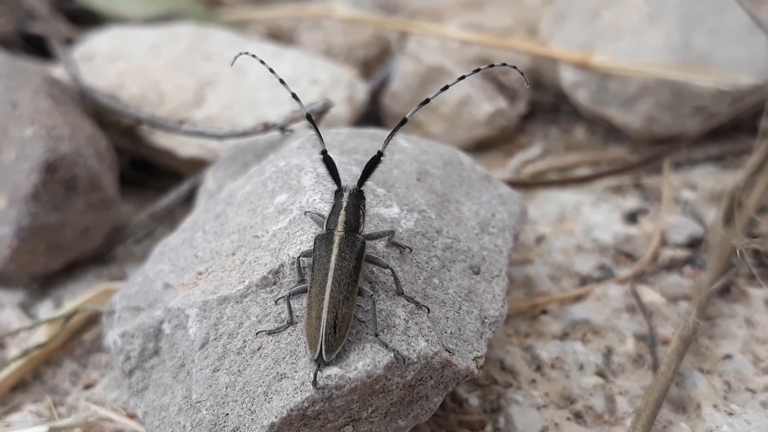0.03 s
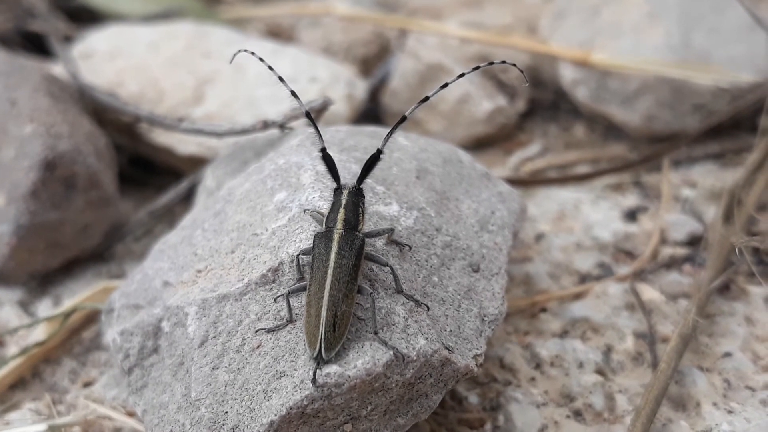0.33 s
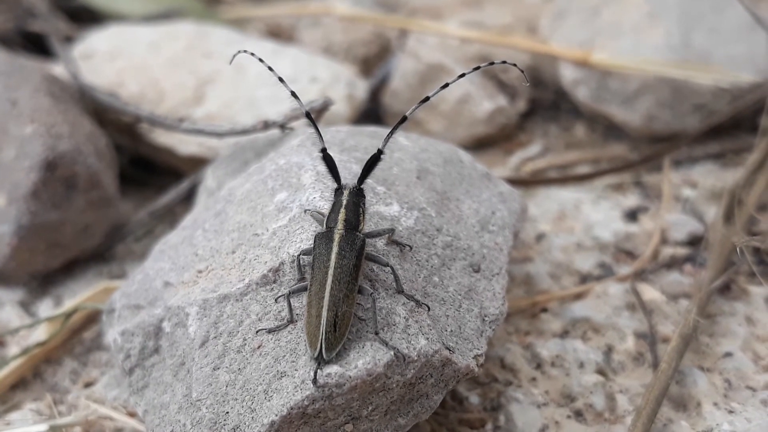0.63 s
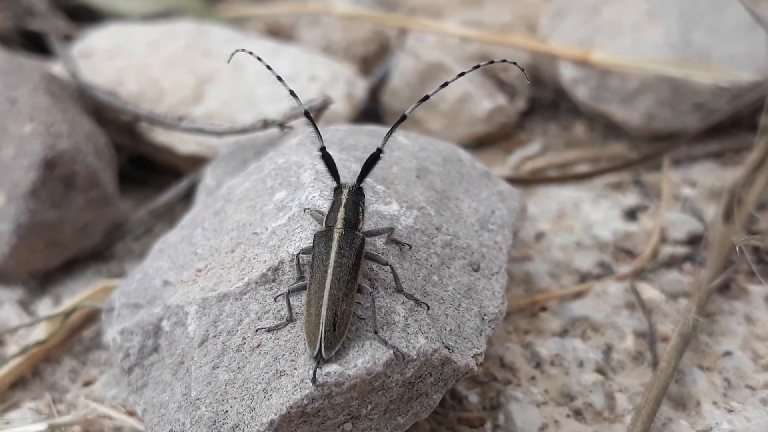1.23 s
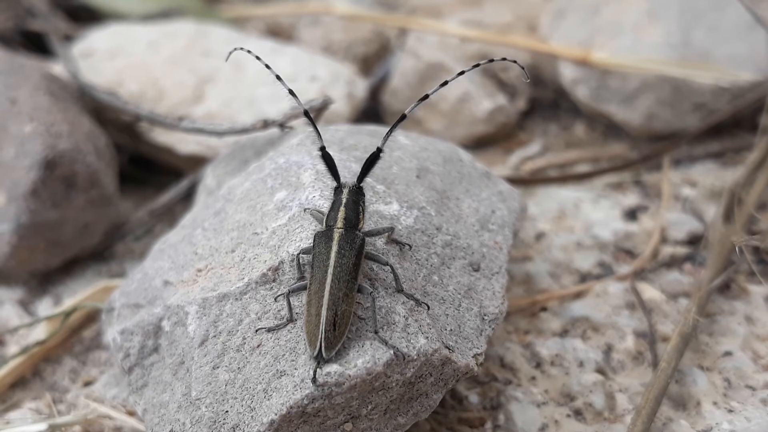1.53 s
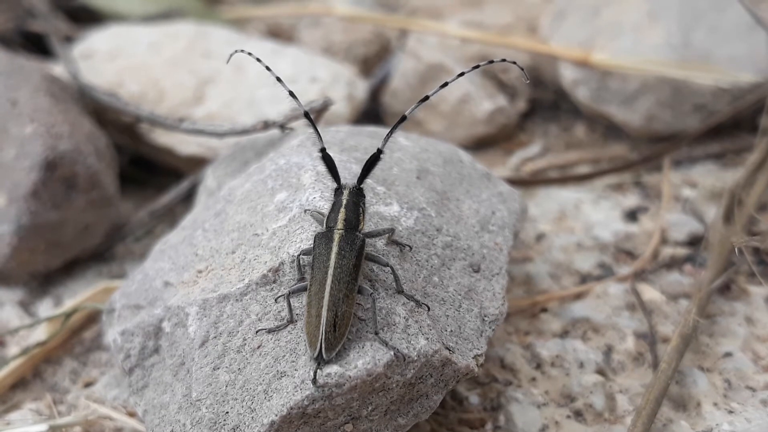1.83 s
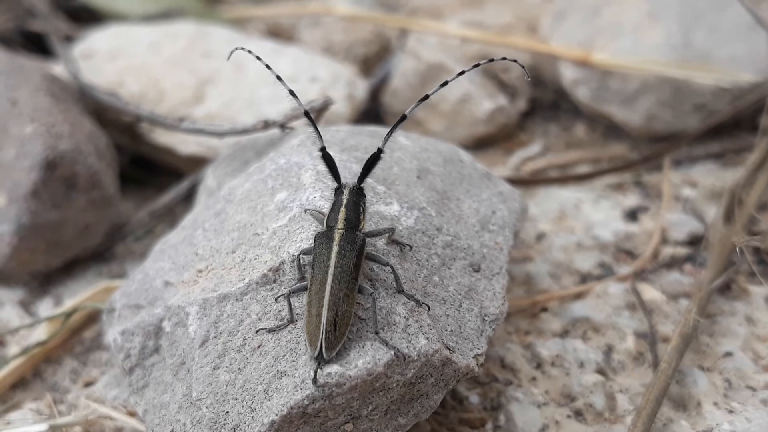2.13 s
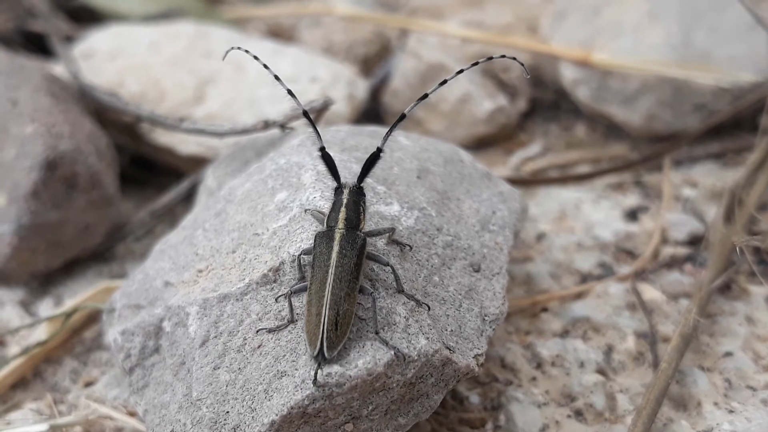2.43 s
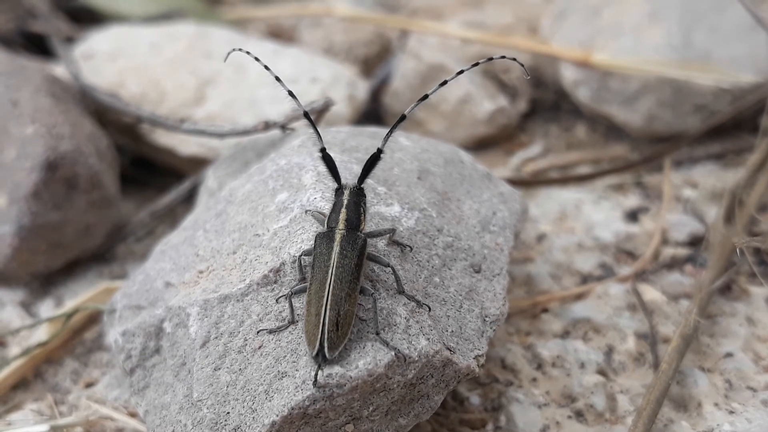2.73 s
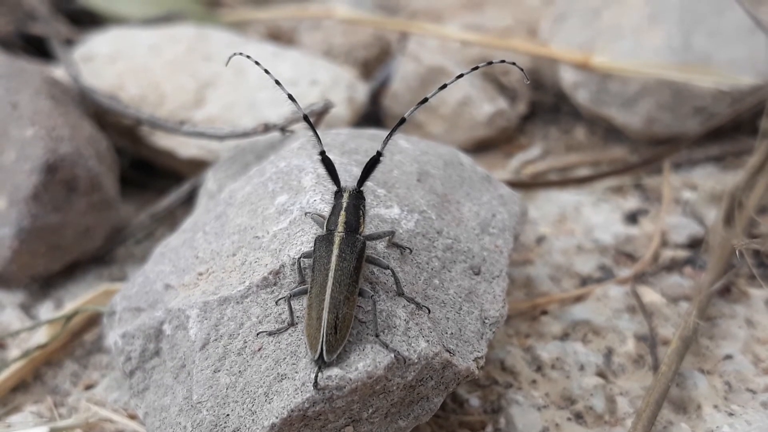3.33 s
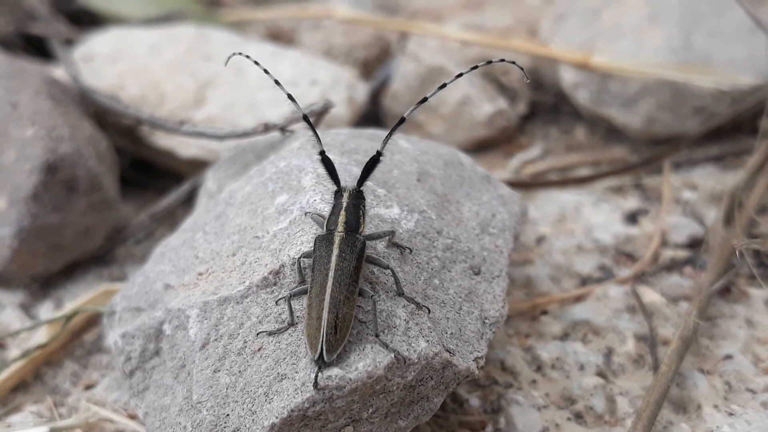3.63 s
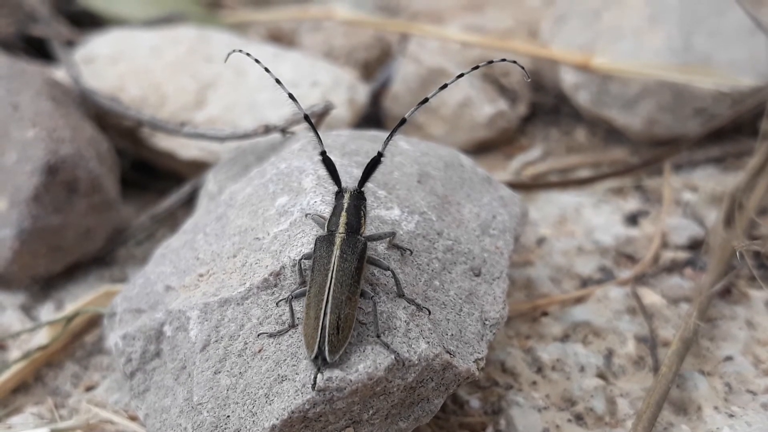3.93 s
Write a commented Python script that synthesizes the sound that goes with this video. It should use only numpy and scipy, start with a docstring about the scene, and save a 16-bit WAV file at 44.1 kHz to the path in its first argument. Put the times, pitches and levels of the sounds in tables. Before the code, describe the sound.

Short, slightly echoing bird chirps come in scattered groups from a distance, loudest near the end. A far road rumbles throughout, while light wind nudges the microphone and something dry ticks faintly nearby in the first half.

```python
"""Small birds chirp among trees and rocks, some way off the microphone: short arching whistles,
pure or raspy, each trailing a diffuse echo. A far road rumbles steadily behind them.
A light breeze blows on the microphone and a few eddies bump it. Close by, something dry
ticks, creaks in runs of tiny slips and rustles faintly.
The image is almost mono; only the microphone hiss has a little width."""
import sys
import numpy as np
from scipy import signal
from scipy.fft import rfft, irfft, next_fast_len
from scipy.io import wavfile
from scipy.ndimage import map_coordinates

SR = 44100
rng = np.random.default_rng(int(sys.argv[2]) if len(sys.argv) > 2 else 0)


def master(y):
    """Save y as 16-bit WAV."""
    cut = np.clip(np.atleast_2d(y).T, -1, 1)
    pcm = np.round(cut * 32767)  # scale
    wavfile.write(sys.argv[1], SR, pcm.astype(np.int16))


N = 176400


def amp(db):
    """Decibels to gain."""
    return 10 ** (np.asarray(db) / 20)


def unit(x):
    """Scale to rms 1."""
    return x / np.sqrt(np.mean(x ** 2) + 1e-20)


def curve(rows):
    """One value per sample from (time [s], value) points."""
    return np.interp(np.arange(N) / SR, *np.transpose(rows))


def wobble(rate):
    """A smooth random curve, rate knots a second."""
    return map_coordinates(rng.standard_normal(4096), [np.arange(N) * rate / SR], mode="wrap")


def filtered(x, response):
    """Filter x by a gain given as a function of frequency."""
    size = next_fast_len(N + 8192)
    return irfft(rfft(x, size) * response(np.fft.rfftfreq(size, 1 / SR)), size)[..., :N]


def noise(colour):
    """Noise of rms 1, its spectrum shaped by (frequency [Hz], gain [dB]) points."""
    points_hz, db = np.transpose(colour)
    white = rng.standard_normal(N)
    return unit(filtered(white, lambda hz: amp(np.interp(np.log(hz + 1), np.log(points_hz), db))))


def add(track, start, x):
    """Mix x into the track at start seconds."""
    i = int(np.clip(round(start * SR), 0, N))
    track[i:i + len(x)] += x[:N - i]


def birds():
    """Whistles some way off arch in pitch and reach the microphone directly and through the trees."""
    # bird notes (start [s], length [s], first pitch [Hz], top pitch [Hz], last pitch [Hz],
    # level [dB], echo send [0-1], rasp [0-1])
    notes = [ (0.069, 0.042, 4230, 4410, 4170, -70, .9, .6),
             (0.136, 0.13, 3700, 3910, 3790, -63, 0.7, 0.48),
             (0.265, 0.072, 3850, 3790, 3680, -63.5, 0.25, .45),
             (0.445, .035, 4120, 4530, 4400, -63.5, .8, 0.57),
             (0.471, 0.055, 5820, 6250, 5400, -64, 0.37, 0.2),
             (0.482, .04, 5080, 5620, 4960, -65, 0.6, 0.64),
             (0.519, 0.045, 3780, 4550, 4030, -58, 0.56, 0.58),
             (0.549, 0.048, 3500, 4365, 3550, -53, 0.88, .8), (.574, .048, 5250, 6100, 5450, -67, 0.4, 1),
             (0.603, 0.022, 5600, 5660, 5460, -61.5, 0.05, 0),
             (.609, 0.023, 3410, 4730, 3330, -55.5, 0.1, .1),
             (.666, 0.021, 3370, 4400, 3670, -59, 0.18, .15),
             (.733, .015, 4430, 4370, 4040, -64.5, .2, 0.02),
             (.783, 0.021, 4000, 4350, 4330, -76, 0.1, 0.4), (1.025, 0.05, 4170, 4400, 4270, -71, 0.6, 0.5),
             (1.419, 0.029, 4480, 4300, 3760, -62, 0.06, 0.24),
             (1.436, 0.06, 3800, 4170, 3830, -67, 0.5, .5),
             (1.427, 0.063, 5470, 5920, 5500, -75, 0.7, 0.96),
             (1.486, 0.013, 3750, 3800, 3670, -59, 0.57, 0.19),
             (1.819, 0.21, 3870, 4000, 3800, -72.5, 0.7, .7),
             (2.012, 0.05, 3650, 3610, 3330, -63, 0.75, 0.26),
             (2.021, 0.033, 3730, 4860, 3900, -56.5, 0.95, 0.47),
             (2.108, 0.029, 3500, 3710, 3280, -56, 0.22, 0.1),
             (2.133, 0.035, 3390, 5070, 3730, -58.5, 0.02, .08),
             (2.159, 0.015, 4000, 4100, 3970, -56.5, .1, 0.2),
             (2.471, 0.015, 4370, 4590, 4550, -66, 0.8, 0.3), (2.525, .04, 5170, 5800, 5460, -75, 0.9, 0.7),
             (2.537, 0.027, 3720, 3910, 3700, -57.5, 0.92, 0.34),
             (2.566, .028, 4090, 4610, 3740, -55, 0.24, 0.04),
             (2.611, 0.015, 3660, 3980, 3640, -59, 0.2, 0.4),
             (2.633, 0.026, 3570, 4027, 3640, -54.5, 0.4, 0.37),
             (2.645, 0.0365, 3930, 4400, 3600, -75, 0.5, 0.63),
             (3.062, .085, 3420, 4700, 4320, -61.5, 0.74, 0.75),
             (3.09, .045, 4900, 5630, 5200, -70, 0.8, .9),
             (3.157, .048, 3394, 4270, 3870, -54.5, 0.5, 0.35),
             (3.183, .04, 5100, 5530, 5200, -67, 0.8, .8), (3.228, 0.046, 3666, 4475, 3460, -62, 1, 0.77),
             (3.255, 0.067, 6550, 6830, 6740, -76.5, 0.9, 0.7),
             (3.268, .042, 3407, 4265, 3740, -53, 0.36, 0.24), (3.315, .01, 5330, 5370, 5300, -64, 0.7, .2),
             (3.348, 0.015, 3510, 4090, 4100, -56, 0.43, 0.63),
             (3.443, 0.085, 4020, 4900, 4180, -55.5, 0.94, 0.93),
             (3.48, .04, 3280, 3670, 3470, -53, 0.9, 0.3),
             (3.494, 0.093, 3200, 3710, 2890, -42, 0.33, 0.13),
             (3.532, 0.12, 3900, 4080, 2910, -49.5, 0.72, 0.18),
             (3.889, 0.043, 4140, 4370, 4270, -71, 0.7, .3),
             (3.96, 0.048, 3370, 3420, 3380, -64.5, 0.84, 0.45)]
    top_at, arch_power = .42, 1.096  # where in a note the arch tops, and how pointed it is
    attack, release = .3, .4  # shares of a note's length
    quaver_depth, flutter_db, rasp_hz, echo_db = .006, 2.5, 534, -1.5
    knot_rates = (220, 220, 1200)  # per second: quaver, flutter, grit
    out = np.zeros(N)
    for start, length, first, top, last, db, send, rasp in notes:
        progress = np.linspace(0, 1, int(length * SR))
        quaver, flutter, grit = (
            map_coordinates(rng.standard_normal(512), [progress * length * rate], mode="wrap")
            for rate in knot_rates)
        arch = np.abs(np.sin(np.pi * np.interp(progress, [0, top_at, 1], [0, .5, 1]))) ** arch_power
        edge_hz = np.where(progress < top_at, first, last)
        hz = (edge_hz + (top - edge_hz) * arch) * (1 + quaver_depth * quaver) + rasp * rasp_hz * grit
        whistle = np.sin(2 * np.pi * np.cumsum(hz) / SR)
        ramp = np.clip(np.minimum(progress / attack, (1 - progress) / release), 0, 1)
        note = amp(db) * unit(np.sin(np.pi / 2 * ramp) * amp(flutter_db * flutter) * whistle)
        echo = signal.fftconvolve(note, woodland_echo())
        echo *= amp(echo_db) * np.linalg.norm(note) / np.linalg.norm(echo)
        send = np.clip(send, .02, .98)
        add(out, start, np.sqrt(1 - send) * note)
        add(out, start, np.sqrt(send) * echo)
    return out


def woodland_echo():
    """One path through the trees: dense near scatter and a longer tail, energy 1."""
    tail_t60_s, near_t60_s, near_db, rise_s = .61, .15, 3, .017
    t = np.arange(SR) / SR
    decay = amp(-60 * t / tail_t60_s) + amp(near_db - 60 * t / near_t60_s)
    response = decay * (1 - np.exp(-t / rise_s)) * rng.standard_normal(SR)
    return response / np.linalg.norm(response)


def wind():
    """A light breeze rumbles on the microphone; single eddies bump it for a few cycles."""
    # eddies on the microphone (centre [s], half length [s], pitch [Hz], peak level [dB])
    puffs = [(0.763, 0.012, 105, -44), (.978, .014, 92.7, -39.5), (1.054, 0.0055, 89, -36),
             (1.088, 0.015, 84.6, -36), (1.118, 0.014, 93, -38), (1.179, 0.019, 96.5, -37.5),
             (1.4, 0.011, 94, -34.5), (1.58, 0.014, 98.7, -48.5), (1.753, 0.011, 60.9, -40.5),
             (1.822, 0.014, 85.16, -41.5), (1.94, 0.011, 134.4, -34.5), (1.984, 0.013, 82.4, -33),
             (2.051, 0.0042, 103.5, -32), (2.278, 0.023, 85, -46.5)]
    # strength of the breeze (time [s], level [dB])
    breeze_level = [(0, -62.5), (.6, -56.5), (1.1, -48), (1.35, -58), (1.65, -56.5), (2.0, -55),
                    (2.35, -56.5), (2.6, -59.5), (4, -59)]
    # spectrum of the wind rumble (frequency [Hz], gain [dB])
    colour = [(20, -19), (30, -9), (42, 0.5), (85, -4.5), (150, -2.5), (300, -20), (600, -44), (2000, -100)]
    pitch_wander, turbulence_db = .12, -11
    t = np.arange(N) / SR
    out = amp(curve(breeze_level) + 1.3 * wobble(16)) * noise(colour)
    turbulence = amp(turbulence_db) * noise(colour)
    wandering_time = np.cumsum(1 + pitch_wander * wobble(110)) / SR
    for centre, half_length, hz, db in puffs:
        swell = amp(db) * np.exp(-((t - centre) / half_length) ** 2)
        bump = np.sin(2 * np.pi * (hz * wandering_time + rng.random()))
        out += swell * (bump + turbulence)
    return out


def ticks():
    """Tiny dry snaps close to the microphone: a burst of treble over a lower body."""
    # dry snaps (time [s], level [dB], body gain [dB])
    snaps = [(.025, -52, -20), (0.172, -52, -20), (.185, -54, -15), (.25, -55, -20), (.347, -53, -18),
             (.462, -55, -20), (.505, -53, -20), (.689, -60, -20), (.71, -56, -20), (.73, -53, -20),
             (.77, -53, -20), (.828, -56, -10), (.865, -52, -15), (0.966, -52.5, -23), (.989, -51, -17),
             (1.094, -51, -20), (1.162, -55, 5), (1.422, -60, 10)]
    # spectrum of a snap's treble (frequency [Hz], gain [dB])
    top_colour = [(2000, -30), (6000, -1.5), (10000, -6.5), (13500, 3), (16000, 3)]
    # spectrum of its body (frequency [Hz], gain [dB])
    body_colour = [(500, -20), (2200, 5), (5000, -3), (10000, -9), (16000, -18)]
    t60_s = .014
    t = np.arange(SR // 20) / SR
    top, body = np.zeros((2, N))
    for start, db, body_db in snaps:
        snap = amp(db - 60 * t / t60_s) / 2
        add(top, start, snap)
        add(body, start, amp(body_db) * snap)
    return top * noise(top_colour) + body * noise(body_colour)


def creaks():
    """Close, faint creaks: quick runs of nearly regular slips that swell and fade."""
    # runs of slips (start [s], length [s], slip rate [1/s], level [dB])
    runs = [(0.557, 0.21, 98, -49), (0.722, .09, 47, -55), (1.134, 0.089, 170, -51.5)]
    # spectrum of a slip (frequency [Hz], gain [dB])
    colour = [(2000, -22), (4500, -8), (7500, -7.5), (10000, -4), (12500, -13), (16000, 0.5)]
    t60_s, scatter_db, jitter = .0094, 1.0, .055
    t = np.arange(SR // 50) / SR
    envelope = np.zeros(N)
    for start, length, rate, db in runs:
        for k, (late, size) in enumerate(rng.standard_normal((64, 2))):
            if k < length * rate:
                swell = np.sqrt(abs(np.sin(np.pi * k / (length * rate))))
                slip = amp(db + scatter_db * size - 60 * t / t60_s) / 2
                add(envelope, start + (k + jitter * late) / rate, swell * slip)
    return envelope * noise(colour)


def rustle():
    """A fine grainy sizzle close by, around the ticks and creaks."""
    # strength of the rustle (time [s], level [dB])
    level = [(0, -84), (.55, -83), (.68, -85), (.78, -81), (.86, -86), (1.0, -82), (1.12, -89), (1.17, -75),
             (1.25, -89), (1.6, -105), (4, -110)]
    # spectrum of the rustle (frequency [Hz], gain [dB])
    colour = [(2000, -27), (5000, -7), (9000, -2), (13000, 0), (16000, -8)]
    return amp(curve(level) + 2.5 * wobble(180)) * noise(colour)


def traffic():
    """The even, dull wash of a far road."""
    # the road as heard at the microphone (time [s], level [dB])
    level = [(0, -51), (1.5, -51.5), (2.5, -51), (4, -50)]
    # spectrum of far traffic (frequency [Hz], gain [dB])
    colour = [(20, -41.5), (40, -21.5), (65, -3.5), (125, 1.5), (170, -7.5), (250, -2.5), (400, -11),
              (520, -11), (820, -7), (1050, -10.5), (1380, -18), (1620, -12.5), (1950, -17.5),
              (2250, -26.5), (2600, -40.5), (4000, -55)]
    return amp(curve(level) + .4 * wobble(3.51)) * noise(colour)


def microphone_hiss():
    """The microphone's steady noise floor, left and right, with a little width."""
    # spectrum of the mid hiss (frequency [Hz], gain [dB])
    mid_colour = [(300, -20), (2500, 1), (4200, 3), (6000, -3.5), (8000, -6.5), (10500, -7.5),
                  (13000, -3.5), (15700, 0.5)]
    # spectrum of the side hiss (frequency [Hz], gain [dB])
    side_colour = [(100, -20), (350, -17.5), (700, -13), (1200, -25), (3000, -0.5), (7000, 6.5),
                   (15700, 6.5)]
    mid_db, side_db = -70.5, -81
    mid = amp(mid_db) * noise(mid_colour)
    side = amp(side_db) * noise(side_colour)
    return np.array([mid + side, mid - side])


def scene():
    """Every source, near or far, sits in the centre over the microphone hiss."""
    centre = birds() + wind() + traffic() + ticks() + creaks() + rustle()
    return centre + microphone_hiss()


def record(dry):
    """The recorder rolls off the deepest bass and keeps nothing above its band limit."""
    low_cut_hz, band_limit_hz = 36, 15800
    return filtered(dry, lambda hz: (hz < band_limit_hz) * (1 - 1 / (1 + (hz / low_cut_hz) ** 4)))


dry = scene()
out = record(dry)
master(out)
```